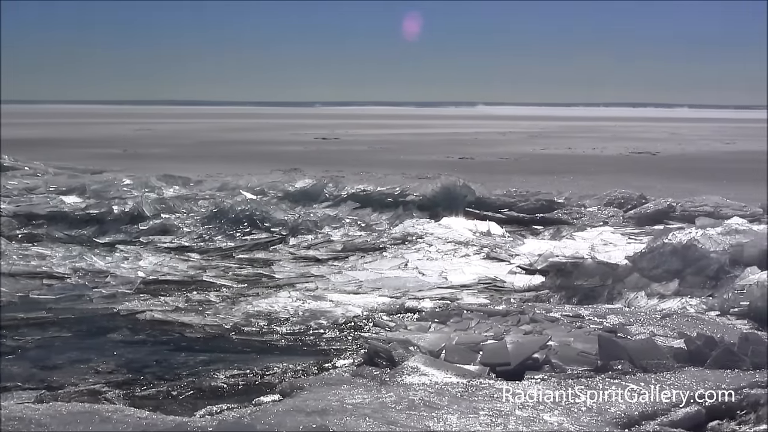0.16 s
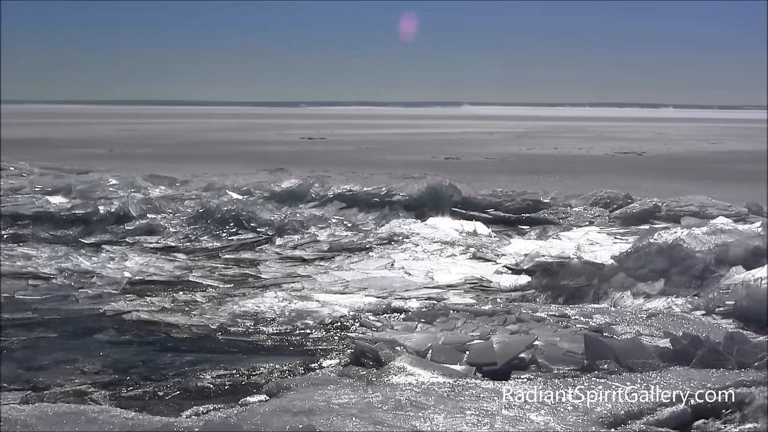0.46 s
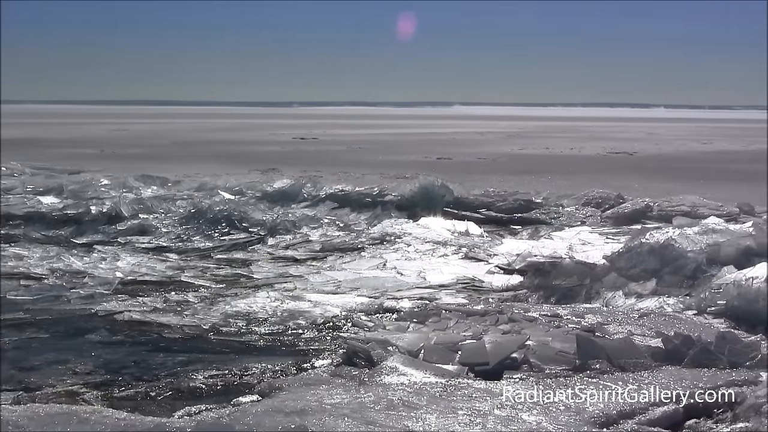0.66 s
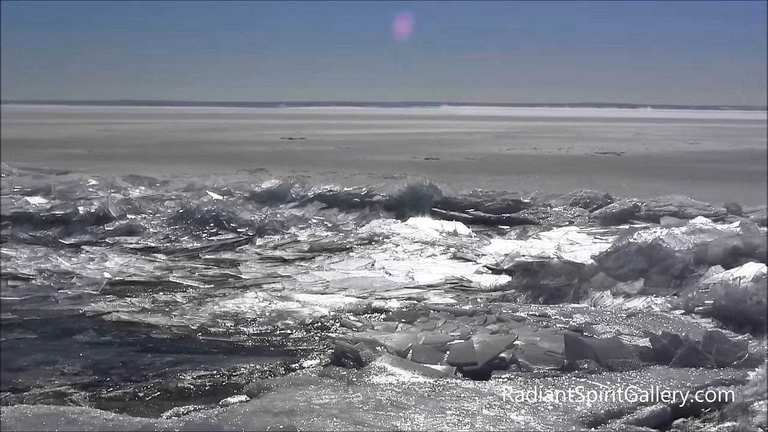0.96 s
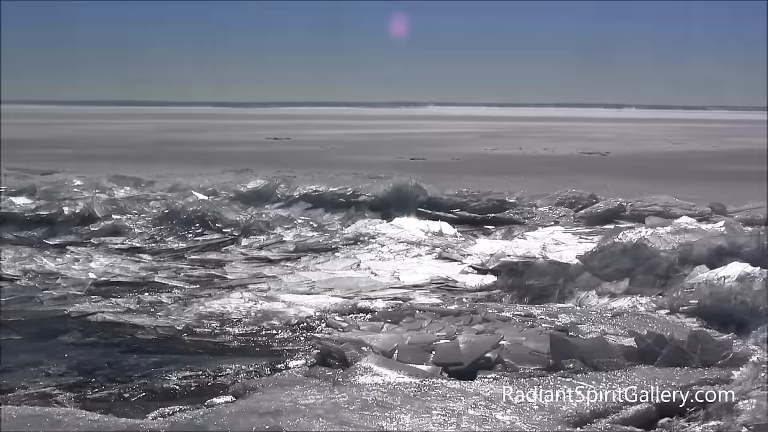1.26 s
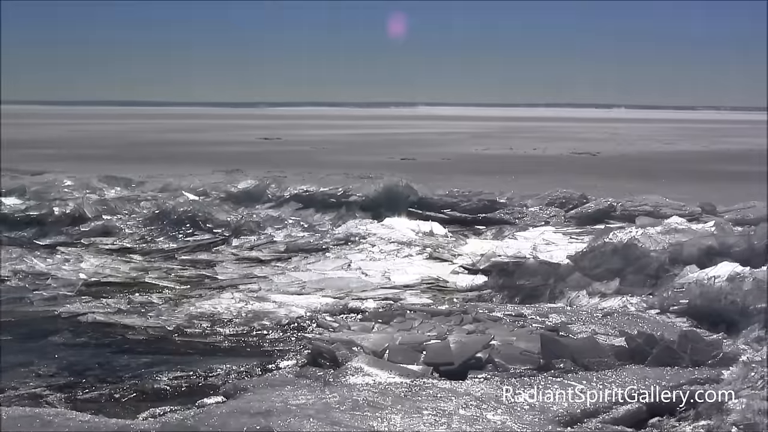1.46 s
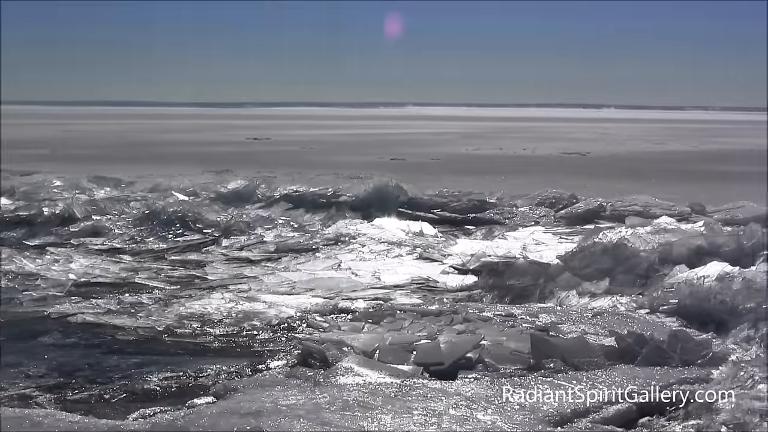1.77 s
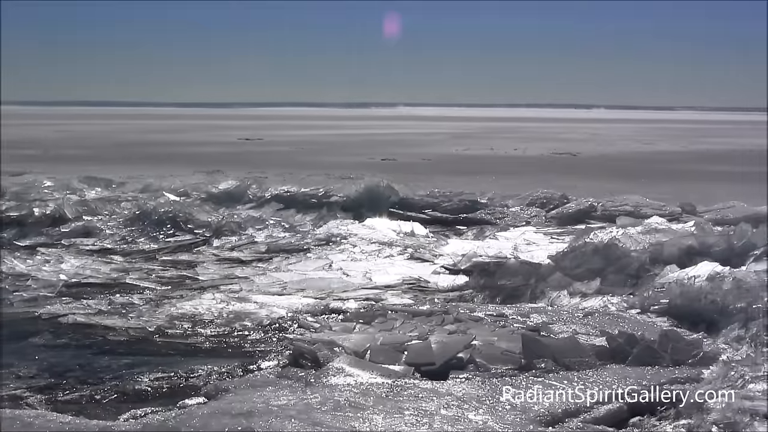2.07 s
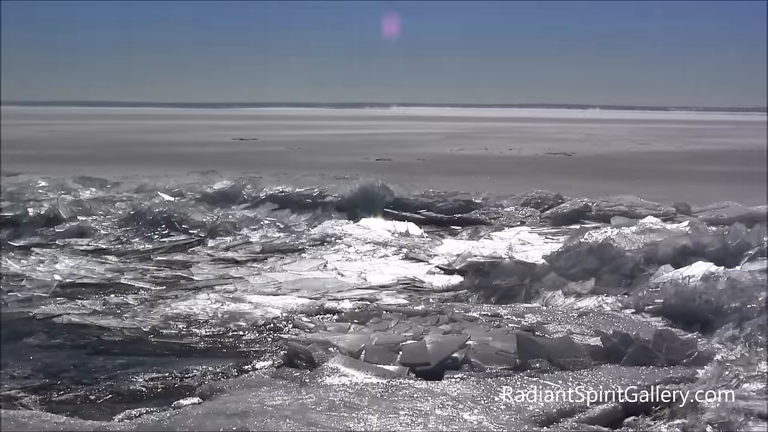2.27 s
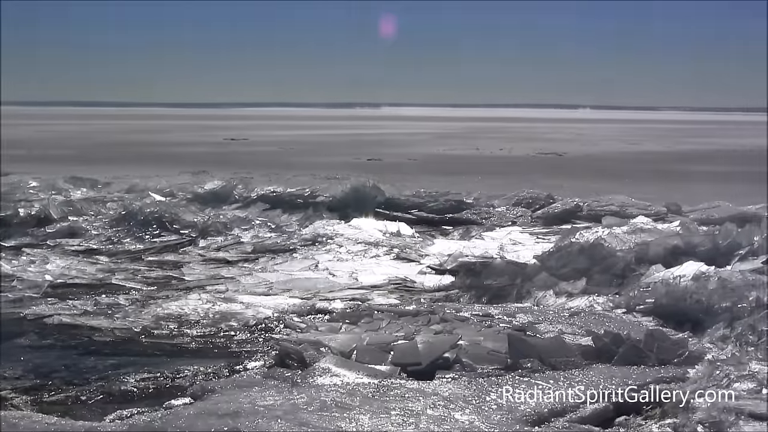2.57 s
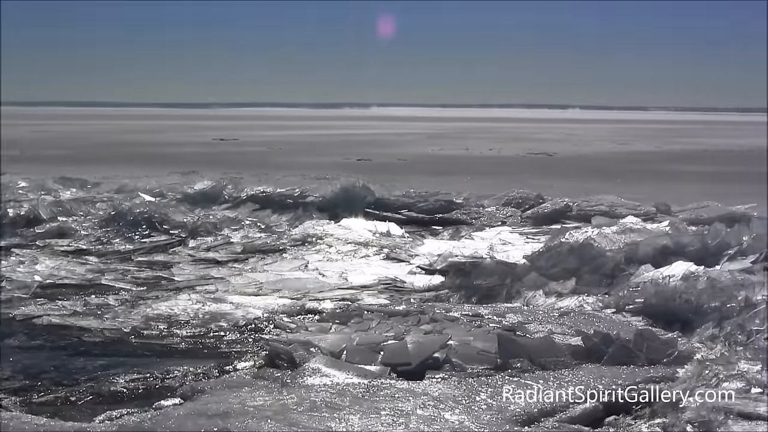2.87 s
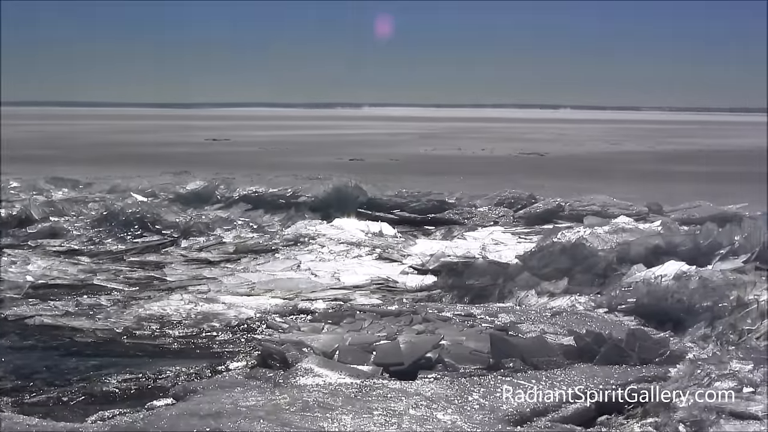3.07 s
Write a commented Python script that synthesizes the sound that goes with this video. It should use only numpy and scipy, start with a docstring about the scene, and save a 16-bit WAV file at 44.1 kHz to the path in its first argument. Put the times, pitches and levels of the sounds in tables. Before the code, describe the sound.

Ice plates crack sharply and knock on a lake shore, over low buffeting wind rumble

```python
"""Plates of ice shift against a lake shore: single dry cracks, each a broadband snap with a few decaying
cycles of its slab's modes, and tiny splinter ticks ringing in narrow bands; dull knocks are slab modes alone.
Behind them the wider ice field rustles, as shaped noise with faint crackle, over a steady hiss.
Wind buffets the microphone, mostly its left port, as low-frequency noise that swells with the gusts.
The hardest crack pushes the recorder's gain down, and it creeps back up."""
import sys
import numpy as np
from scipy import signal
from scipy.fft import rfft, irfft, next_fast_len
from scipy.io import wavfile
from scipy.ndimage import uniform_filter1d, map_coordinates

SR = 44100
rng = np.random.default_rng(int(sys.argv[2]) if len(sys.argv) > 2 else 0)


def pcm_store(signal):
    """Save signal as 16-bit PCM."""
    levels = np.round(np.clip(np.atleast_2d(signal), -1, 1) * 32767)
    wavfile.write(sys.argv[1], SR, levels.astype(np.int16).T)


N = 142443

BLOW_S = 0.001337  # span over which a short sound's level counts
TICK_PAN_DB = 2  # left minus right, for ticks, splintering and the middle of the crackle


def amp(db):
    """Level to gain: 20 dB per factor of ten in amplitude."""
    return 10 ** (np.asarray(db) / 20)


def unit(x):
    """Normalise the mean power, to rms 1."""
    return x / np.sqrt(np.mean(x ** 2) + 1e-20)


def blow(x):
    """Normalise the energy of a transient to that of rms 1 over BLOW_S."""
    energy = np.mean(np.sum(x ** 2, axis=-1))
    return x / np.sqrt(energy / (BLOW_S * SR) + 1e-20)


def pan(db):
    """Place a source by level difference: left and right gains of mean power 1."""
    return unit(amp(np.array([[db], [-db]]) / 2))


def along(points, hz, axis=1):
    """Interpolate one column of a table over logarithmic frequency."""
    p = np.transpose(points)
    return np.interp(np.log(hz + 1), np.log(p[0] + 1), p[axis])


def curve(rows):
    """Envelope by linear interpolation: one value per sample from (time, value) rows."""
    return np.interp(np.arange(N) / SR, *np.transpose(rows))


def wobble(rate):
    """Slow random modulation: a smooth curve through random knots, rate of them a second."""
    knots = rng.standard_normal(int(N * rate / SR) + 4)
    return map_coordinates(knots, [np.arange(N) * rate / SR])


def filtered(x, response):
    """Linear filtering: the spectrum of x times a response of frequency."""
    m = next_fast_len(N + SR // 2)
    return irfft(rfft(x, m) * response(np.fft.rfftfreq(m, 1 / SR)), m)[..., :N]


def band(x, lo_hz, hi_hz):
    """Causal band-pass: the response never precedes its excitation."""
    hi = min(hi_hz, SR * .48)  # stay below half the sample rate
    b, a = signal.butter(2, [min(lo_hz, hi - 100), hi], 'band', fs=SR)
    return signal.lfilter(b, a, x)


def add(out, s, sound):
    """Superposition: mix a sound in at time s."""
    part = out[:, max(round(s * SR), 0):][:, :sound.shape[-1]]
    part += sound[..., :part.shape[-1]]


def rush(spectrum, alike):
    """Partly coherent stereo noise of rms 1; alike(hz) is the likeness of left and right."""
    def mid_side_gains(hz):
        turn = np.arccos(np.clip(alike(hz) + 0 * hz, -1, 1)) / 2
        return amp(along(spectrum, hz)) * [np.cos(turn), np.sin(turn)]

    mid, side = filtered(rng.standard_normal((2, N)), mid_side_gains)
    return unit(np.array([mid + side, mid - side]))


def wind(swell_s=0.057):
    """Turbulent pressure on the ports: heavy eddies that swell with the gusts, and lighter flutter."""
    # level of the heavy eddies: t/s, level/dB
    gust_rows = [(0, -20), (.28, -20.5), (.38, -14.5), (.5, -16.5), (.66, -17.5), (.75, -11), (.85, -13),
                 (.95, -16), (1.25, -21.5), (1.42, -16), (1.65, -18.5), (1.85, -15.5), (2.05, -21.5),
                 (2.15, -17), (2.35, -19), (2.65, -15), (2.92, -22), (3.2, -13.5)]
    # single eddies that thump the ports: t/s, rise over the gusts/dB, half-width to 1/e of the rise/s
    thump_rows = [(0.59, 11, 0.014), (1.518, 9.5, 0.041)]
    # gain of the flutter: t/s, gain/dB
    flutter_rows = [(.17, -23), (.42, -14), (1.25, -17), (1.85, -15), (2.45, -22.5), (3.2, -17.5)]
    # spectrum of all the eddies before levelling: f/Hz, relative density level/dB per Hz
    rumble_rows = [(8, -5.5), (22, 4.5), (45, -2.5), (70, -7), (110, -14.5), (170, -23), (300, -32.5),
                   (600, -50), (2000, -70)]
    pan_db, alike, half_gain_hz = 11, 0.27, 108  # half_gain_hz divides heavy eddies from flutter

    eddies = rush(rumble_rows, lambda hz: alike) * pan(pan_db)
    heavy = filtered(eddies, lambda hz: 1 / (1 + (hz / half_gain_hz) ** 4))
    flutter = eddies - heavy

    # even out the heavy eddies' own swells, so that the gusts set their level
    power = np.abs(uniform_filter1d(np.mean(heavy ** 2, axis=0), int(swell_s * SR)))
    even = heavy / np.sqrt(power + 1e-9)
    t = np.arange(N) / SR
    thump_db = sum(db * np.exp(-((t - s) / width) ** 2) for s, db, width in thump_rows)
    return amp(curve(gust_rows) + thump_db) * even + amp(curve(flutter_rows)) * flutter


def steady_hiss():
    """Stationary noise: a constant spectrum, nearly incoherent between left and right."""
    # spectrum of the hiss: f/Hz, relative density level/dB per Hz
    hiss_rows = [(1000, 4.5), (4500, 3), (8000, -1), (12000, -4), (16000, -10)]
    level_db, pan_db = -49.5, 3.5
    return amp(level_db) * pan(pan_db) * rush(hiss_rows, lambda hz: .08)


def knock(hz, life, size=1500):
    """Damped modes: a slab swells and dies within a few cycles; life is each mode's cycles per 60 dB."""
    # modes of a slab: multiple of its pitch, relative level/dB
    mode_rows = [(1.002, 41), (1.65, -39), (2.6, 14)]
    rise = 0.053  # time constant of the swell as a share of life
    cycles = hz * np.arange(size) / SR
    ring = 0
    for k, db in mode_rows:
        fade = np.exp(-np.log(1000) * k * cycles / life)
        swell = (1 - np.exp(-k * cycles / (rise * life))) ** 2
        ring = ring + amp(db) * np.sin(2 * np.pi * k * cycles) * fade * swell
    return -blow(ring)


def ice_field(flutter_db=1.7, pan_spread_db=4):
    """Incoherent sum: countless far contacts merge into a rustle; a few stand out as faint crackle."""
    # level of the rustle: t/s, level/dB
    field_rows = [(0, -31), (.17, -34), (.3, -30), (1.02, -33.5), (1.25, -32.5), (1.9, -32), (2.97, -33.5),
                  (3.11, -27), (3.23, -29)]
    # spectrum of the rustle: f/Hz, relative density level/dB per Hz, left minus right/dB, left-right likeness
    rustle_rows = [(96, 2.5, -11, 0.29), (270, 4, 5, -0.43), (465, -1.5, 4, -0.46), (765, -2, -0.5, 0.18),
                   (940, -2, 1.5, 0.27), (1544, -6, 5, 0.38), (2235, -13, 7, -0.22),
                   (3270, -21.5, 8.5, 0.11), (5800, -29.5, 3, 0.24), (15000, -40, -10, 0.064)]
    rate_per_s, floor_db, spread_db = 170, -12.5, 2.5  # crackle; floor over the rustle
    centre_hz, octaves, life_cycles = 1180, 0.79, 4.8  # octaves either way

    rustle = rush(rustle_rows, lambda hz: along(rustle_rows, hz, axis=3))
    out = unit(rustle * amp(flutter_db * wobble(24.76)))
    out = unit(filtered(out, lambda hz: amp(np.outer([1, -1], along(rustle_rows, hz, axis=2)) / 2)))

    count = int(rate_per_s * N / SR)
    for when, pitch, size, side in rng.uniform(-1, 1, (count, 4)):
        db = floor_db - spread_db * np.log(max(abs(size), .03))  # loud ones are rare
        far_crack = knock(centre_hz * 2 ** (octaves * pitch), life_cycles)
        add(out, abs(when) * N / SR, amp(db) * pan(TICK_PAN_DB + pan_spread_db * side) * far_crack)
    return amp(curve(field_rows)) * out


def fracture(t60, size=1500):
    """Impulsive excitation: uneven micro-slips, equally strong at all pitches, die in milliseconds."""
    apart, spiky = 0.87, 0.44  # part that differs between the ports; unevenness of the slips
    t = np.arange(size) / SR
    slips = rng.standard_normal(size) + apart * rng.standard_normal((2, size))
    slips = slips * np.exp(spiky * rng.standard_normal(size))
    z = rfft(slips * np.exp(-np.log(1000) * t / t60), 2 * size)
    local_power = np.abs(uniform_filter1d(np.abs(z) ** 2, size=25))
    return irfft(z / np.sqrt(local_power + 1e-12))[:, :size]


def edge(hz, t60):
    """Resonance: a breaking edge filters its fracture to a narrow band."""
    width = 1.147  # ratio from the centre to either band edge
    return blow(band(fracture(t60), hz / width, hz * width))


def ticks():
    """Resonance without a slab: splinters break off, a few near among many faint; low ones ring longer."""
    # near splinters: t/s, f/Hz, level/dB
    tick_rows = [(0.3495, 5460, -29), (.57, 3340, -41), (0.8826, 8400, -36), (1.5356, 9500, -42),
                 (2.2603, 8700, -43), (2.4775, 8900, -45), (2.479, 3660, -35.5), (2.4815, 2950, -39),
                 (2.783, 2320, -34.5), (3.0866, 11100, -45)]
    life_cycles = 87  # fade of 60 dB in the fracture
    rate_per_s, faint_db, spread_db, faint_hz = 22, -50, 5.5, 4960  # faint ticks all over the ice
    draws = rng.uniform(-1, 1, (int(rate_per_s * N / SR), 3))
    faint = [(abs(when) * N / SR, faint_hz * 2 ** pitch, faint_db + spread_db * size)
             for when, pitch, size in draws]
    out = np.zeros((2, N))
    for s, hz, db in list(tick_rows) + faint:
        add(out, s, amp(db) * pan(TICK_PAN_DB) * edge(hz, life_cycles / hz))
    return out


def bumps():
    """Modal excitation without fracture: plates bump together and knock dully."""
    # dull knocks: t/s, f/Hz, level/dB
    bump_rows = [(.2875, 750, -30), (.3895, 806, -24), (2.1556, 755, -27.5), (2.738, 720, -30.5),
                 (3.029, 990, -25)]
    out = np.zeros((2, N))
    for s, hz, db in bump_rows:
        add(out, s, amp(db) * knock(hz, 9.3))  # life in cycles
    return out


def coloured(x, spectrum):
    """Minimum-phase filtering: shape a spectrum without smearing the sound ahead of its attack."""
    n = 2 * x.shape[-1]
    cepstrum = irfft(np.log(amp(along(spectrum, np.fft.rfftfreq(n, 1 / SR)))))
    response = np.exp(rfft(2 * cepstrum[:n // 2], n))  # folded onto positive times
    return irfft(rfft(x, n) * response)[..., :n // 2]


def cracks():
    """Fracture and scattering: each crack snaps, splinters and knocks its slab; nearby plates scatter it."""
    # near cracks: t/s, slab f/Hz, slab cycles per 60 dB, knock level/dB, snap level/dB, edge f/Hz,
    # edge level/dB, splintering level/dB, fracture t60/s, left minus right of all but splintering/dB
    crack_rows = [(0.3078, 570, 6.5, -8, -17.5, 2490, -24, -26.5, 0.01, 5.5),
                  (0.3444, 905, 6, -15, -24, 5000, -22.5, -31.5, 0.012, 4.5),
                  (0.381, 895, 5, -24, -36, 4800, -36.5, -43, 0.0071, 3),
                  (0.56, 910, 3.5, -18.5, -22, 2550, -31.5, -33, 0.009, 5.5),
                  (0.6491, 1400, 17, -25.5, -32, 2470, -29, -29.5, 0.0074, 22),
                  (.8730, 1060, 5.5, -1.5, -11, 2540, -24.5, -21.5, 0.0052, 4),
                  (1.1349, 990, 4.5, -17, -32.5, 2450, -35, -43.5, 0.0073, 5.5),
                  (1.1965, 890, 10, -25, -54, 5460, -37.5, -55, 0.012, 0),
                  (1.5044, 650, 4.5, -16.5, -34, 5800, -44.5, -37, 0.01, 5),
                  (1.5638, 1070, 2.5, -16, -18, 5150, -31, -27.5, 0.0084, 4.5),
                  (2.1146, 1005, 9.5, -12, -22.5, 4520, -30.5, -42, 0.011, 4.5),
                  (3.0255, 1450, 10, -24, -30, 1720, -26, -41, 0.068, 1)]
    # colour of a snap: f/Hz, relative density level/dB per Hz
    snap_rows = [(600, -17.5), (1600, 2), (2100, -12.5), (2550, 0), (3400, -8.5), (4800, -8.5),
                 (12000, -28.5)]
    echo_db, echo_t60_s = -18.5, 0.045
    lead_s = .000035  # the sound reaches the left port first

    out, t = np.zeros((2, N)), np.arange(SR // 10) / SR
    for s, hz, life, knock_db, snap_db, edge_hz, edge_db, splinter_db, t60, pan_db in crack_rows:
        snap = blow(coloured(fracture(t60), snap_rows))
        body = amp(knock_db) * knock(hz, life) + amp(snap_db) * snap + amp(edge_db) * edge(edge_hz, t60)
        splinters = amp(splinter_db) * blow(band(fracture(t60), 5900, 13700))
        sound = pan(pan_db) * body + pan(TICK_PAN_DB) * splinters
        add(out, s, sound)

        echo = band(rng.standard_normal((2, len(t))), 503, 7550) * np.exp(-np.log(1000) * t / echo_t60_s)
        scatter = signal.fftconvolve(sound, echo / np.linalg.norm(echo), axes=1)
        add(out, s + BLOW_S, amp(echo_db) * scatter)
    # a phase in proportion to frequency is a time shift, half the lead on each port
    return filtered(out, lambda hz: np.exp(1j * np.pi * lead_s * np.outer([1, -1], hz)))


def scene():
    """Superposition: near cracks, knocks and ticks over wind, hiss and the far ice."""
    return wind() + steady_hiss() + ice_field() + ticks() + bumps() + cracks()


def record(dry):
    """Gain control that ignores the bass, ducks at once and recovers slowly; then full scale and band limit."""
    limit_db, recover_db_per_s, sense_hz, top_hz = -7, 1.34, 348, 15900
    sensed = filtered(dry, lambda hz: hz > sense_hz)
    power = np.abs(uniform_filter1d(np.mean(sensed ** 2, axis=0), int(BLOW_S * SR)))
    excess_db = np.maximum(10 * np.log10(power + 1e-12) - limit_db, 0)
    recovery_db = recover_db_per_s * np.arange(N) / SR
    # a running maximum against a rising ramp holds each duck and lets it fall at the recovery rate
    duck_db = np.maximum.accumulate(excess_db + recovery_db) - recovery_db
    return filtered(np.clip(dry * amp(-duck_db), -1, 1), lambda hz: hz < top_hz)


dry = scene()
out = record(dry)
pcm_store(out)
```